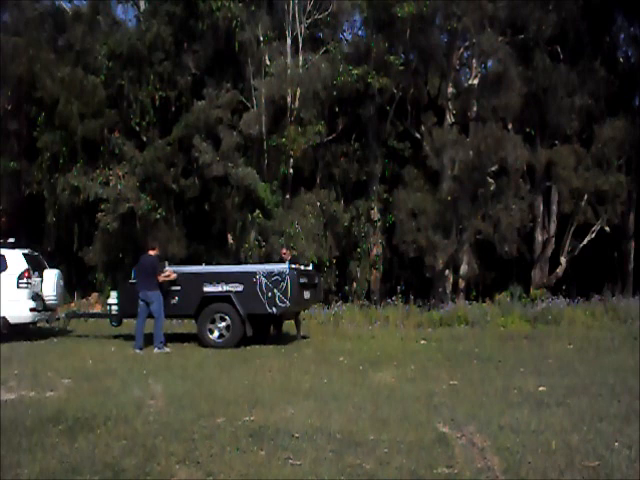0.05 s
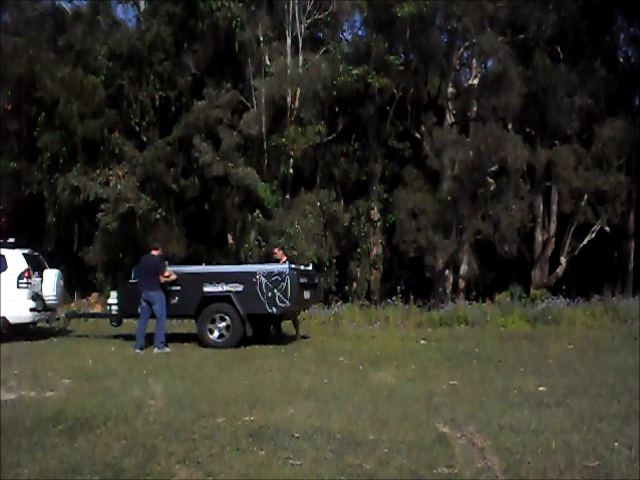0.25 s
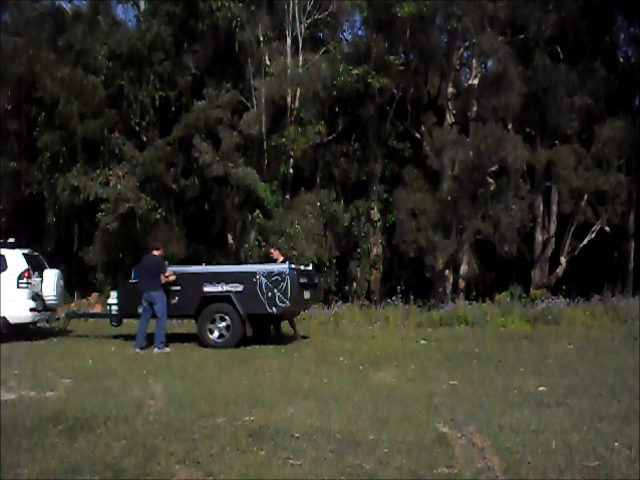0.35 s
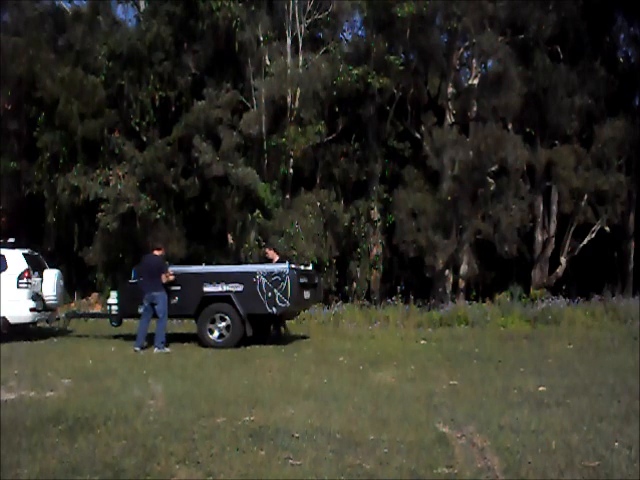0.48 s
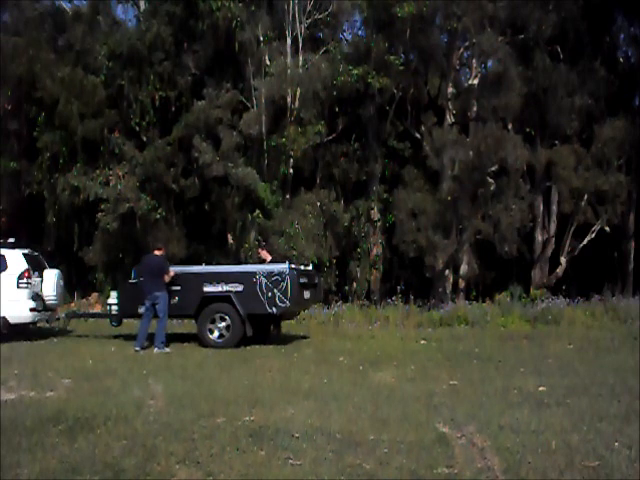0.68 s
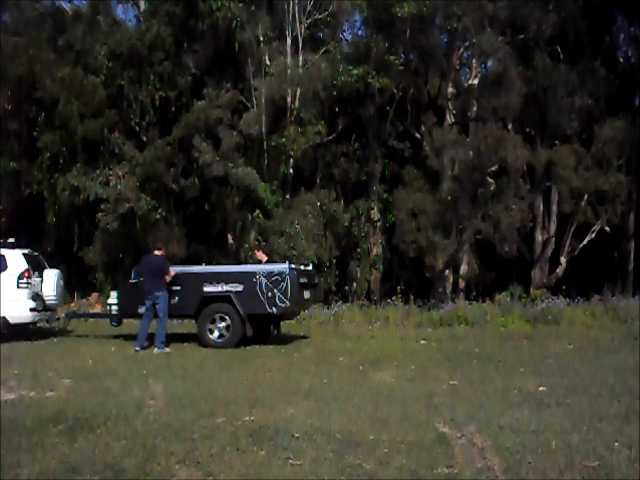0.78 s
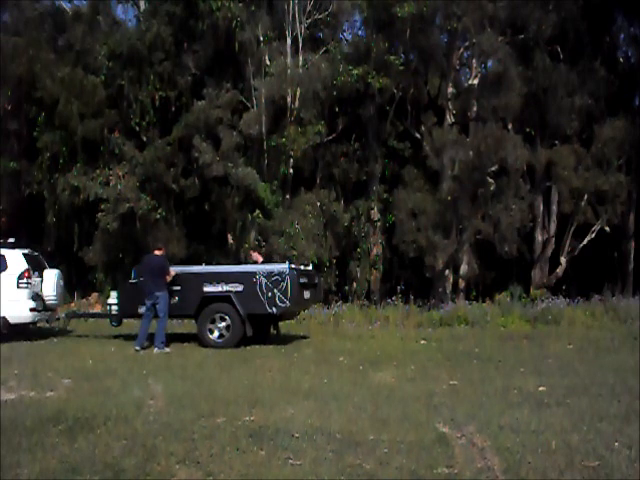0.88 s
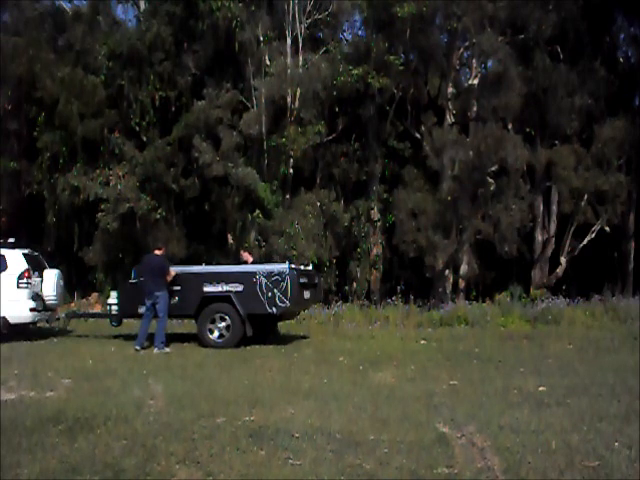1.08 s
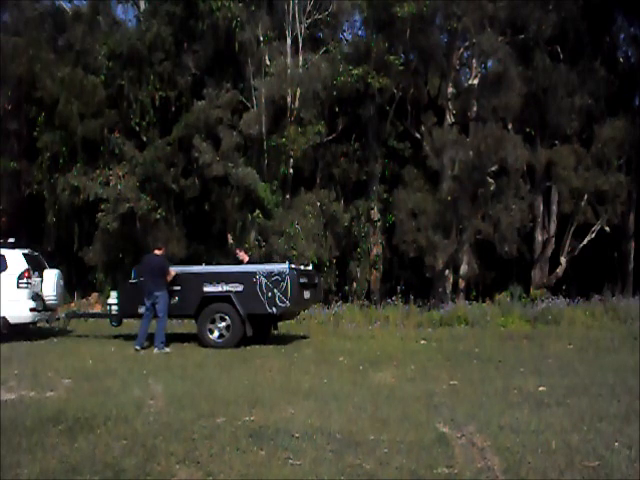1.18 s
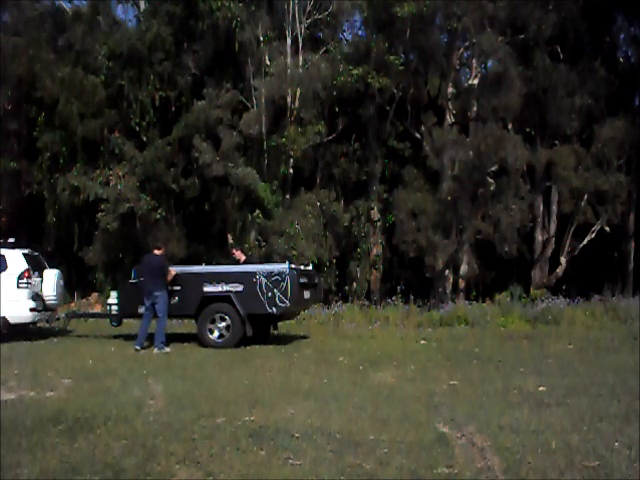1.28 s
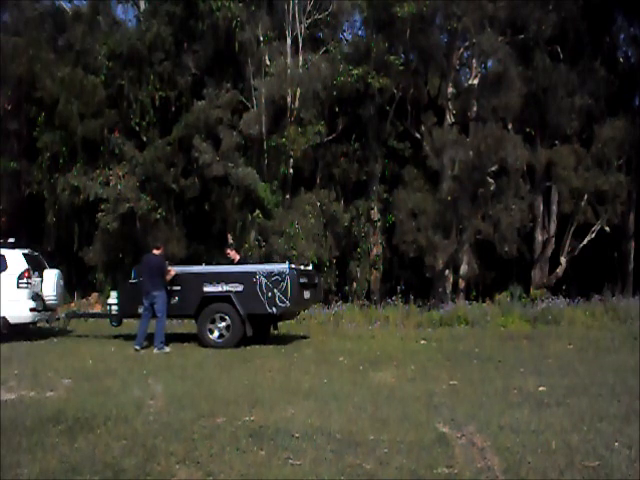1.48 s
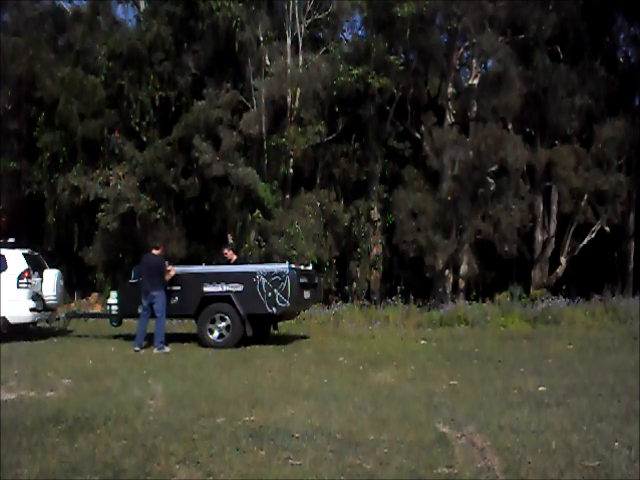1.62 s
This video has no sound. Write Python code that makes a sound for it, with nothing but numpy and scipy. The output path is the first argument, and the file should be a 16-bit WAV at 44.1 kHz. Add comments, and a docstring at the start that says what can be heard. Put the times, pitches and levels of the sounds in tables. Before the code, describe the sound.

A steel latch snaps shut on a camper trailer at about 0.2 seconds, with a sharp, bright ping and very short clatter. A soft echo from the trees dies within half a second, while the trailer's body keeps ringing faintly on one low note. A faint tick follows at 0.8 seconds. Quiet hiss and low wind rumble run throughout, with a few distant chirps, mostly in the first half second.

```python
"""A very short, bright ping and a clatter: a steel latch snaps shut on a camper trailer in a clearing.
The spring makes the ping, then the catch bounces home, shakes loose fittings and knocks the trailer's
body, which keeps ringing on one low note. The edge of the forest scatters the click back.
A faint tick follows. Behind it all are quiet hiss, low wind rumble, a far hum, a few distant birds
and a camera's thin whine."""
import sys
import numpy as np
from scipy import signal
from scipy.fft import rfft, irfft, next_fast_len
from scipy.io import wavfile

SR = 44100
rng = np.random.default_rng(int(sys.argv[2]) if len(sys.argv) > 2 else 0)


def generate_wav(signal):
    """Clip the signal to [-1, 1] and save it as 16-bit WAV at the path in sys.argv[1]."""
    frames = np.transpose(np.atleast_2d(signal))
    scaled = np.clip(frames, -1, 1) * 32767
    pcm = np.round(scaled).astype(np.int16)
    wavfile.write(sys.argv[1], SR, pcm)


N = 72765

# the spring lets go: start_s, level_db
SPRING_SNAPS = [(0.2197, -10), (0.2223, -20), (0.225, -28)]
PING_HZ, PING_RISE_S, PING_FADE_S = 8416, 0.0005, 0.0058  # a fade time is the time to drop 60 dB
# the catch strikes home: start_s, level_db
CATCH_HITS = [(.2166, -12), (.2198, -3.5), (0.2216, -2.5), (0.223, 0.5), (0.2247, -1), (0.2299, -6),
              (0.236, -14)]
# notes of the catch and its panel: pitch_hz, level_db, fade_s
PANEL_NOTES = [(758, -49, 0.082), (1226, -45, 0.036), (1898, -51, 0.075), (2030, -49, .05),
               (2226, -41, 0.052), (2430, -51, .06), (2620, -57, .065), (3140, -49, 0.05)]
# tone of each hit's crack: pitch_hz, level_db
CRACK_TONE = [(100, -10), (350, -5), (550, -11.5), (1000, -4), (1550, -25), (2300, -2), (3600, -8.5),
              (5300, -9.5), (7000, -4), (8500, 0.5), (10500, -7)]
CRACK_DB, CRACK_FADE_S = -32, 0.012
# tone of the shivering fittings: pitch_hz, level_db
SHIVER_TONE = [(25, -1), (55, 7), (130, 5.5), (350, 6), (500, -12), (800, 2), (1200, 0), (1550, -6),
               (2150, 1.5), (3600, -8.5), (5300, -14.5), (7000, -14.5), (8500, -9.5), (10500, -11)]
# how long they shiver: pitch_hz, fade_s
SHIVER_FADES = [(100, 0.26), (800, 0.2), (2500, 0.15), (9000, 0.14)]
BLOW_S, SHIVER_DB = 0.2225, -34.5
# low notes of the trailer's body: pitch_hz, level_db, fade_s, rise_s
BODY_NOTES = [(54.6, -36, 0.22, 0.0062), (133.4, -46.5, 4.02, .006), (266.7, -66, 5.2, .02),
              (291, -27, 0.031, 0.0013), (348.7, -35, 0.12, 0.0094), (390, -44, .1, .01),
              (439, -64, .6, .03)]
# tone of the echo from the trees: pitch_hz, level_db
ECHO_TONE = [(40, -8), (150, 3), (450, 2), (1000, -3), (1600, -7), (2100, -5), (3000, -7.5), (5500, -14),
             (7000, -11), (8000, -4.5), (9000, -8), (10300, -8.5)]
# high sounds leave the echo sooner: pitch_hz, share_of_fade_time
ECHO_FADE_SHARES = [(200, 1), (2000, 0.97), (9000, .7)]
ECHO_DB, ECHO_DELAY_S, ECHO_RISE_S, ECHO_FADE_S = -42, 0.037, 0.026, 0.59
# a small part is touched: start_s, level_db
TICK_HITS = [(.8171, -1.5), (.8183, 1.5), (.8205, -12)]
# notes of that part: pitch_hz, level_db, fade_s
TICK_NOTES = [(756, -59, 0.045), (1470, -59, 0.034), (1900, -52.5, 0.02), (2130, -52, .018),
              (2290, -52, 0.014), (3300, -50, .009), (4000, -52, 0.0062)]
# tone of its tiny crack: pitch_hz, level_db
TICK_TONE = [(500, -4), (2500, 0), (4000, -1), (5200, -12), (7500, -3), (10500, -12)]
TICK_CRACK_DB, TICK_FADE_S = -53.5, 0.018
# far birds: start_s, length_s, start_hz, end_hz, level_db
BIRD_CHIRPS = [(0.027, .045, 2248, 1554, -60), (0.197, .02, 2780, 2650, -55.5),
               (0.369, .016, 2660, 2760, -53), (0.416, 0.025, 2160, 1800, -56.5),
               (1.3, .085, 2260, 3790, -66.5)]
# tone of the hiss: pitch_hz, level_db
HISS_TONE = [(150, -18), (250, -3.5), (445, -7.5), (570, -8), (666, -7), (755, -10), (938, -10),
             (1450, -11.5), (3520, -15), (10300, -19.5), (13400, -38), (22000, -120)]
# tone of the wind rumble: pitch_hz, level_db
WIND_TONE = [(10, -4), (31, 3), (46, -4.5), (62, 0), (80, -7.5), (100, -5), (170, -15), (260, -18.5),
             (450, -37.5), (1000, -71)]
HISS_DB, WIND_DB = -58.5, -51.5
HUM_HZ, HUM_WIDTH_HZ, HUM_DB = 144.8, 2.9, -64
# the camera's steady whine: pitch_hz, level_db
WHINE_NOTES = [(7140, -76), (7880, -80)]
# the microphone weakens the highest sounds: pitch_hz, level_db
MIC_TONE = [(9900, 0), (10450, -4), (10750, -11.5), (11050, -30)]
TOP_HZ = 11100


def spring_ping():
    """The steel spring's note swells within a millisecond and dies at once."""
    out = np.zeros(N)
    for start_s, db in SPRING_SNAPS:
        t = np.arange(N) / SR - start_s
        # a smooth join between a fast rise and a fast fade
        swell = np.exp(-np.logaddexp(-t / PING_RISE_S, np.log(1000) * t / PING_FADE_S))
        out += amp(db) * swell * np.sin(2 * np.pi * PING_HZ * t)
    return out


def catch_clatter():
    """Each hit of the catch makes a crack and sets the panel ringing."""
    out = np.zeros(N)
    for start_s, db in CATCH_HITS:
        click = amp(CRACK_DB) * crack(CRACK_TONE, start_s, CRACK_FADE_S)
        out += amp(db) * (click + ring(PANEL_NOTES, start_s, scatter_db=0.5))
    return out


def loose_fittings():
    """Loose metal shivers after the blow, and its high sounds die first."""
    return amp(SHIVER_DB) * fading_noise(SHIVER_TONE, SHIVER_FADES, BLOW_S)


def trailer_body():
    """The blow thumps the trailer and leaves it humming."""
    t = since(BLOW_S)
    out = np.zeros(N)
    for hz, db, fade_s, rise_s in BODY_NOTES:
        loudness = amp(db - 60 * t / fade_s) * (1 - np.exp(-t / rise_s))
        out += loudness * np.sin(2 * np.pi * hz * t)
    return out


def forest_echo():
    """Trunks and leaves return the blow as a late, soft wash of noise."""
    start_s = BLOW_S + ECHO_DELAY_S
    fades = [(hz, share * ECHO_FADE_S) for hz, share in ECHO_FADE_SHARES]
    swell = 1 - np.exp(-since(start_s) / ECHO_RISE_S)
    return amp(ECHO_DB) * swell * fading_noise(ECHO_TONE, fades, start_s)


def faint_tick():
    """A light touch on a small part, with two tiny bounces."""
    out = np.zeros(N)
    for start_s, db in TICK_HITS:
        click = amp(TICK_CRACK_DB) * crack(TICK_TONE, start_s, TICK_FADE_S)
        out += amp(db) * (click + ring(TICK_NOTES, start_s, scatter_db=3))
    return out


def birds():
    """Short sliding whistles from the forest."""
    out = np.zeros(N)
    for start_s, length_s, start_hz, end_hz, db in BIRD_CHIRPS:
        progress = np.minimum(since(start_s) / length_s, 1)
        pitch_hz = start_hz + (end_hz - start_hz) * progress
        swell = np.sin(np.pi * progress) ** 2
        out += amp(db) * swell * np.sin(2 * np.pi * np.cumsum(pitch_hz) / SR)
    return out


def background():
    """Even hiss, soft wind rumble and a far hum that wavers because it is a thin band of noise."""
    hum = filtered(rng.standard_normal(N), lambda hz: np.exp(-0.5 * ((hz - HUM_HZ) / HUM_WIDTH_HZ) ** 2))
    return amp(HISS_DB) * noise(HISS_TONE) + amp(WIND_DB) * noise(WIND_TONE) + amp(HUM_DB) * unit(hum)


def crack(tone, start_s, fade_s):
    """The short burst of noise when hard things meet."""
    t = since(start_s)
    return noise(tone) * (t > 0) * amp(-60 * t / fade_s)


def ring(notes, start_s, scatter_db):
    """The fading notes of a struck part, a little different in strength on each hit."""
    t = since(start_s)
    out = np.zeros(N)
    for hz, db, fade_s in notes:
        struck_db = db + scatter_db * rng.standard_normal()
        out += amp(struck_db - 60 * t / fade_s) * np.sin(2 * np.pi * hz * t)
    return out


def fading_noise(tone, fades, start_s):
    """Noise from start_s on, each pitch fading at its own speed."""
    hz, times_s, bands = signal.stft(noise(tone), SR, nperseg=256)
    fade = amp(-60 * np.maximum(times_s - start_s, 0) / along(fades, hz)[:, None])
    return (since(start_s) > 0) * signal.istft(bands * fade, SR)[1][:N]


def noise(tone):
    """Noise with the given tone and an average strength of 1."""
    return unit(shaped(rng.standard_normal(N), tone))


def shaped(x, tone):
    """Give x a tone and cut everything above TOP_HZ."""
    return filtered(x, lambda hz: amp(along(tone, hz)) * (hz < TOP_HZ))


def filtered(x, gain_at):
    """Turn each pitch in x up or down by gain_at(hz)."""
    size = next_fast_len(N + SR // 2)
    return irfft(rfft(x, size) * gain_at(np.fft.rfftfreq(size, 1 / SR)), size)[:N]


def along(points, hz):
    """Read between a table's rows, with octaves evenly spaced."""
    pitches_hz, values = np.transpose(points)
    return np.interp(np.log(hz + 1), np.log(pitches_hz + 1), values)


def since(start_s):
    """Seconds since start_s, zero before it."""
    return np.maximum(np.arange(N) / SR - start_s, 0)


def amp(db):
    """Turn decibels into a multiplier."""
    return 10 ** (np.asarray(db) / 20)


def unit(x):
    """Scale to an average strength (rms) of 1."""
    return x / np.sqrt(np.mean(x ** 2) + 1e-20)


def scene():
    """The latch, its echo and the clearing."""
    latch = spring_ping() + catch_clatter() + loose_fittings() + trailer_body()
    return (latch + forest_echo() + faint_tick() + birds() + background())[None]


def record(dry):
    """The camera adds its faint whine, and the microphone loses the highest sounds."""
    whine = sum(amp(db) * np.sin(2 * np.pi * hz * since(0)) for hz, db in WHINE_NOTES)
    return shaped(dry[0] + whine, MIC_TONE)[None]


dry = scene()
out = record(dry)
generate_wav(out)
```